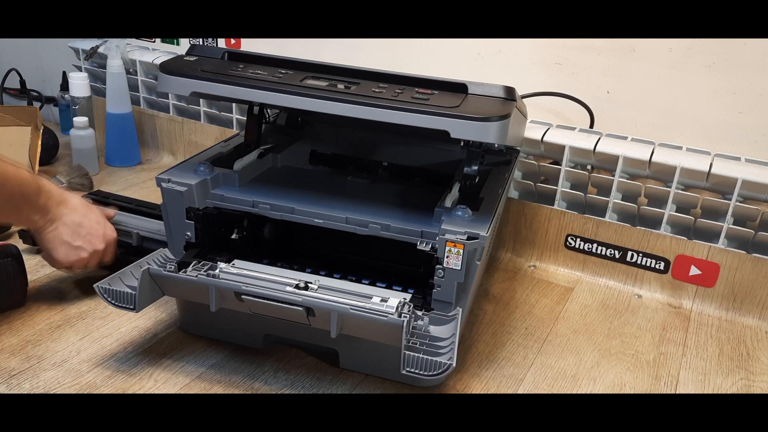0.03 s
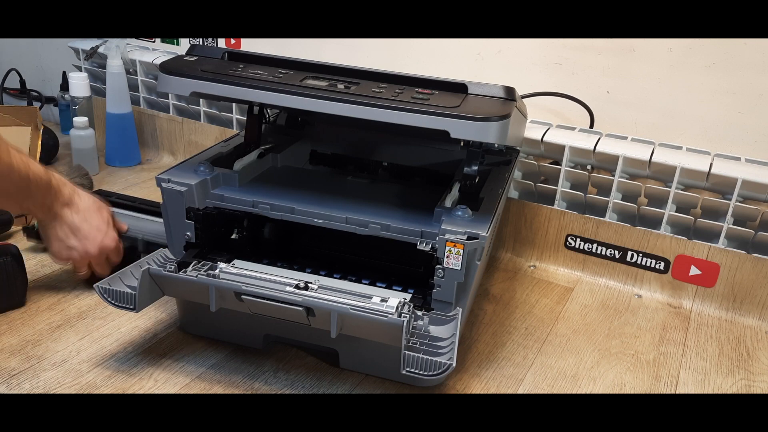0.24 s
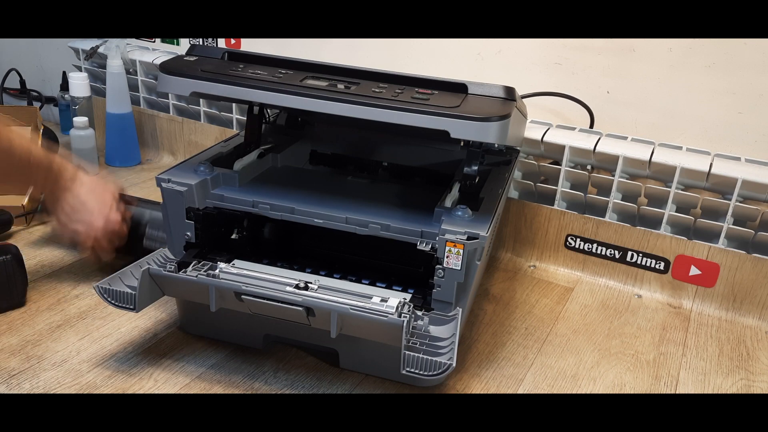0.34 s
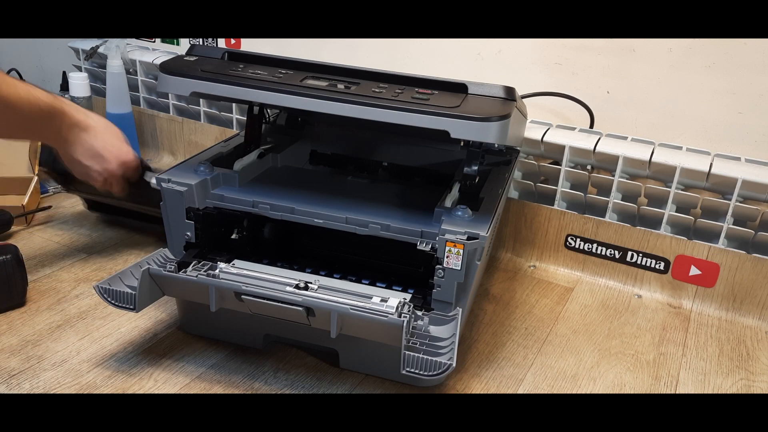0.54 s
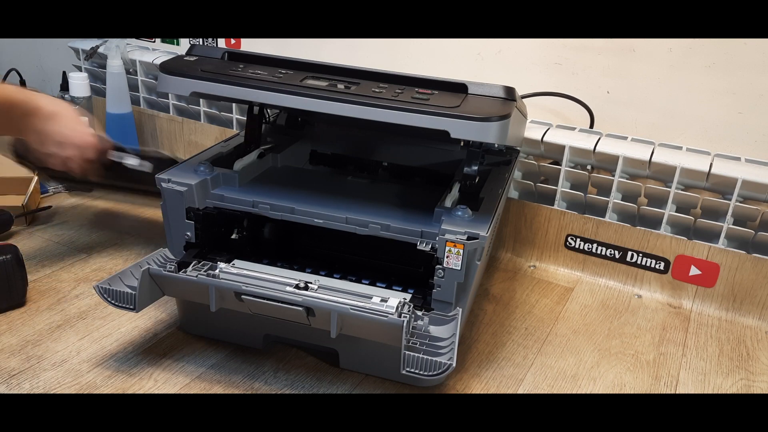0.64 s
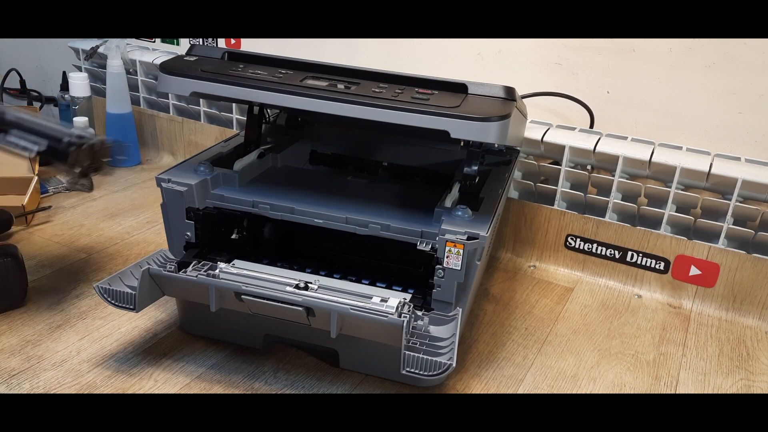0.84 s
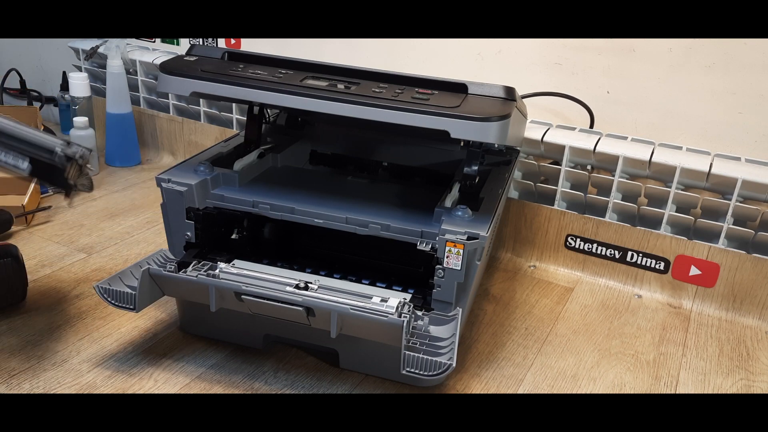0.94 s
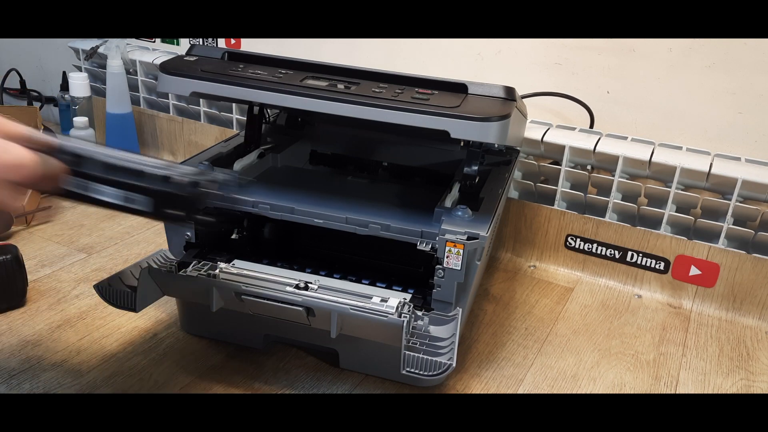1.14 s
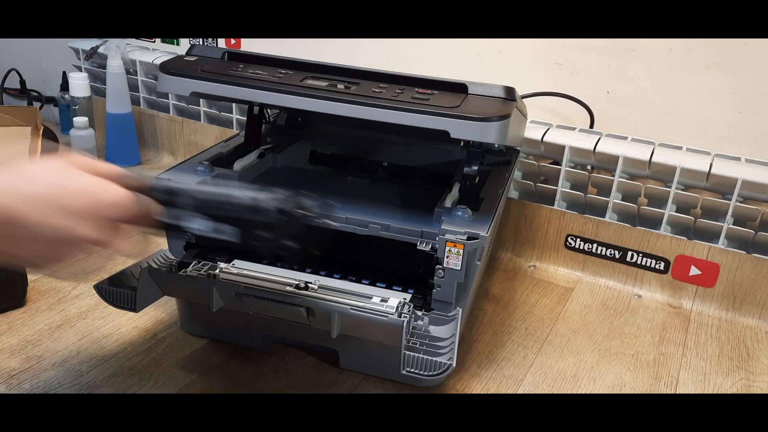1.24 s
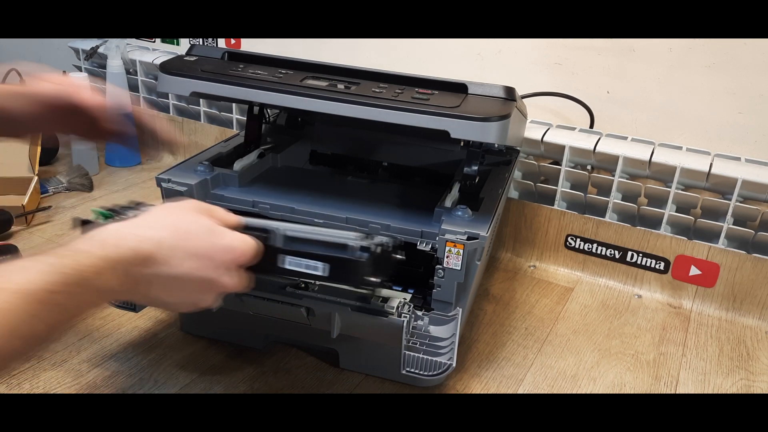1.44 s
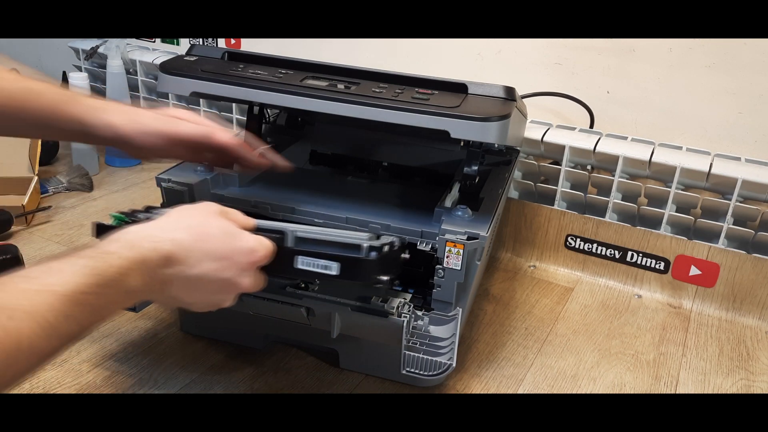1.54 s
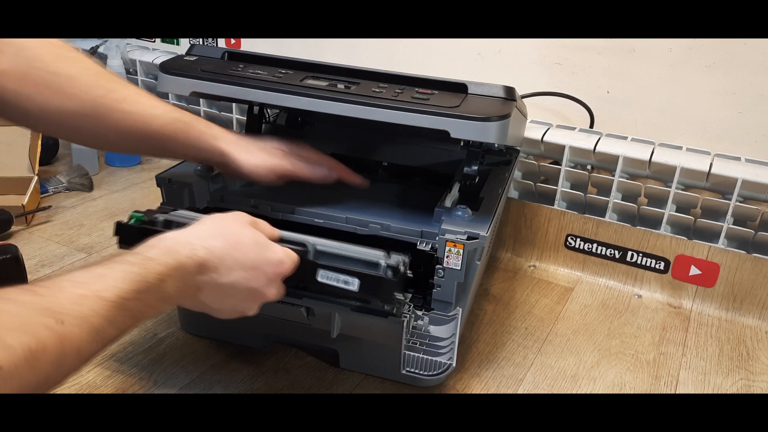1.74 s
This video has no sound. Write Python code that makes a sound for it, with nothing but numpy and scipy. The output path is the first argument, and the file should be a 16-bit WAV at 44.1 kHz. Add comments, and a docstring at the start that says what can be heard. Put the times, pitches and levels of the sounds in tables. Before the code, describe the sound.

Hard plastic cartridge clatter: a short scrape, one loud woody knock with chattering parts, quiet handling, then a softer cluster of hollow bumps against an open printer, heard close in stereo in a small humming workroom.

```python
"""A toner cartridge is dragged off a wooden workbench, tips and knocks on it, then bumps into an open laser printer.
Close stereo microphones in a small workroom hear a low steady drone: coloured noise with narrow resonances.
The drag and the hand's rub are grainy noise; ticks are short noise bursts; small catches ping as decaying sines.
Plastic contacts are noise dying band by band, with a room tail; bench, body and printer add decaying sines."""
import sys
import numpy as np
from scipy import signal
from scipy.io import wavfile

SR = 44100
rng = np.random.default_rng(int(sys.argv[2]) if len(sys.argv) > 2 else 0)


def wav_record(signal):
    """Record a signal, one row per channel, as 16-bit PCM in the file named by sys.argv[1]."""
    frames = np.transpose(np.atleast_2d(signal))
    bounded = np.clip(frames, -1, 1)
    # unit amplitude maps onto the largest positive 16-bit level
    quanta = np.round(bounded * 32767).astype(np.int16)
    wavfile.write(sys.argv[1], SR, quanta)


N = 79380
T = np.arange(N) / SR  # time [s]
RING_T = T[:SR // 2]  # time since a contact [s]

# Room drone: relative density (f/Hz, level/dB per Hz); resonances (f/Hz, width/Hz, rms level/dB)
DRONE_COLOUR = [(25, -16.5), (55, -2), (120, -2), (200, -5), (300, 0.5), (500, 0.5), (650, -11.5),
                (900, -13), (1600, -18.5), (3000, -44), (6000, -38.5), (9500, -29.5), (15500, -45.5)]
DRONE_RESONANCES = [(119.7, 14, -60), (168, 5.3, -67.5), (267.8, 4.8, -70), (440.3, 6, -62),
                    (624.4, 11, -70.5)]
DRONE_DB = -59

# Dragging over the bench: loudness (t/s, level/dB); relative density (f/Hz, level/dB per Hz)
DRAG_LEVEL = [(0, -50), (.05, -57.5), (.11, -47), (.15, -50.5), (.19, -38.5), (.235, -43), (.36, -44.5),
              (.44, -52), (.515, -53), (.55, -56), (.66, -65.5), (.9, -65), (1.19, -89), (1.24, -67),
              (1.3, -63.5), (1.6, -76), (1.8, -55.5)]
DRAG_SPECTRUM = [(60, -9), (130, 14), (400, 7), (900, -2), (1400, 0), (2100, -2.5), (2800, -8.5),
                 (3600, -6.5), (6000, -17.5), (9000, -35.5), (15500, -33.5)]
# Hand and plastic rubbing: loudness (t/s, level/dB); relative density (f/Hz, level/dB per Hz)
RUB_LEVEL = [(0, -68), (.055, -76), (.065, -63.5), (.2, -59.5), (.39, -65), (.45, -60), (.53, -72),
             (.6, -67.5), (.69, -69.5), (.76, -55.5), (.815, -55), (.88, -70.5), (1.11, -95), (1.15, -71),
             (1.32, -71.5), (1.39, -61), (1.5, -73), (1.72, -73.5), (1.79, -57)]
RUB_SPECTRUM = [(100, -5.5), (500, -1), (1500, 3.5), (3500, 0), (6000, -1.5), (9500, -1.5), (13000, -5.5),
                (15500, -6)]
DRAG_RING_DB = -65.5

# Low thumps of the bench top: faint ones during the drag, the strongest as the cartridge knocks
# (t/s, relative level/dB)
BENCH_THUMPS = [(.001, -7), (.178, -5.5), (.1945, 1), (.2555, 9), (.40, -7)]
# Bench top resonances (f/Hz, relative level/dB, t60/s)
BENCH_RESONANCES = [(94.5, -43, 0.34), (121, -30, 0.18), (176, -41.5, 0.11)]
# Small catches spring and ping (t/s, relative level/dB)
PING_HITS = [(.175, -6), (.209, 5.5), (.474, -12.5)]
# Catch resonances (f/Hz, relative level/dB, t60/s)
CATCH_RESONANCES = [(8900, -46.5, .07), (9140, -54, .1), (10860, -55, .07)]
# Dry ticks of loose parts (t/s, relative level/dB)
TICK_HITS = [(.2085, 1), (.2338, 9.5), (.555, 9), (.6225, 6)]
# The cartridge shifts in the hand (t/s, relative level/dB, contact brightness f/Hz)
NUDGE_CONTACTS = [(.463, -12, 1500), (.49, -5.5, 905), (.507, -8, 700), (.727, -17.5, 900),
                  (1.2165, -15, 1310)]
# Relative density of those shifts (f/Hz, level/dB per Hz)
NUDGE_SPECTRUM = [(60, -21), (150, -9), (290, 11), (500, 5.5), (900, -3.5), (1800, -4.5), (3000, -21),
                  (8000, -19), (15500, -25)]
NUDGE_DB, TICK_DB, TICK_BRIGHT_HZ = -35, -54.5, 12000

# The cartridge knocks on the bench and its parts chatter (t/s, relative level/dB, contact brightness f/Hz)
KNOCK_CONTACTS = [(.234, -14.5, 5020), (.2392, -5, 18000), (.2418, 1, 14000), (.2462, 0, 3754),
                  (.2503, -3.5, 6000), (.2585, -6.5, 2195), (.2665, -7.5, 3495), (.2755, -6.5, 5000),
                  (.286, -13, 2000), (.3065, -24, 1800), (.345, -23, 500)]
# Its weight lands on the bench (t/s, relative level/dB)
BENCH_THUDS = [(.2465, 5)]
# Resonances of the cartridge on the bench (f/Hz, relative level/dB, t60/s)
BODY_RESONANCES = [(117.5, -31, 0.19), (161.1, -27, 0.27), (186, -29.5, 0.26), (198.5, -34, 0.16),
                   (314.3, -34, 0.25), (443.6, -17.5, 0.21), (472.7, -26.5, 0.28), (548, -17.5, 0.092),
                   (606, -25.5, .1), (661.6, -30.5, .13), (824, -27.5, 0.14), (990, -33.5, 0.26),
                   (1351, -43, 0.31), (1885, -38, 0.23), (2096, -26, 0.08), (2166, -30.5, 0.3),
                   (2248, -28, 0.21), (2487, -35, .24), (2980, -33, 0.11), (3285, -36, 0.24),
                   (3554, -34, .22), (4355, -39, 0.17)]
# Crowded ringing of the cartridge shell: density (f/Hz, relative level/dB per Hz); decay (f/Hz, t60/s)
CARTRIDGE_SPECTRUM = [(60, -9.5), (120, -2), (170, -1), (230, -6.5), (400, 5), (700, -4.5), (1100, -3.5),
                      (1600, -3.5), (2200, -2.5), (3000, -8), (4500, -9.5), (7000, -16), (9000, -14),
                      (12000, -16), (15500, -23.5)]
CARTRIDGE_DECAY = [(100, 0.067), (500, 0.087), (2200, .14), (6000, 0.23), (14000, 0.15)]

# The cartridge meets the printer (t/s, relative level/dB, contact brightness f/Hz)
BUMP_CONTACTS = [(1.6165, -6, 14000), (1.6205, -6, 2900), (1.6315, -2.5, 8900), (1.6425, -6, 3470),
                 (1.6525, 3.5, 2760), (1.662, -17, 1530), (1.681, 0.5, 1020), (1.697, -6, 900),
                 (1.719, -27, 900), (1.797, -12, 4000)]
# The printer takes the weight (t/s, relative level/dB)
HOUSING_HITS = [(1.6535, 2.5)]
# Printer housing resonances (f/Hz, relative level/dB, t60/s)
HOUSING_RESONANCES = [(240, -41, 0.29), (298, -57, 0.43), (370, -47, 0.16), (409, -41, 0.067),
                      (867, -47, 0.26), (938, -35, 0.11), (1020, -45, 0.14), (1183, -43.5, 0.23),
                      (1385, -55, .2), (1620, -39, 0.1)]
# The printer rocks on its feet (t/s, relative level/dB)
FEET_HITS = [(1.666, -2)]
# Resonances of the printer on its feet (f/Hz, relative level/dB, t60/s)
FEET_RESONANCES = [(58, -43, 1), (78.3, -47, 0.75), (99.7, -37.5, 0.5), (115, -38, 0.2)]
# Crowded ringing of the printer shell: density (f/Hz, relative level/dB per Hz); decay (f/Hz, t60/s)
PRINTER_SPECTRUM = [(60, 1), (110, 12.5), (180, 2), (290, 17), (500, 9), (1000, 4.5), (2000, 1.5),
                    (3000, -7), (6000, -14), (9500, -10.5), (15500, -21)]
PRINTER_DECAY = [(100, 0.18), (500, 0.098), (2200, 0.2), (12000, 0.29)]
CARTRIDGE_DB, PRINTER_DB = -19.5, -35.5

# Room tail after a contact (f/Hz, t60/s)
ROOM_DECAY = [(100, .42), (1000, .38), (2200, .4), (4000, .29), (9000, .24), (14000, .19)]
# Build-up time constant: this many cycles, but never longer than the limit in seconds
BUILD_CYCLES, LONGEST_BUILD_S = 0.84, 0.0052
CHATTER_PER_S, CHATTER_SHARE = 2200, 0.56  # tiny rebounds within contacts; share of noise power

# Microphone pair: left-right likeness (f/Hz, correlation); balance (f/Hz, left minus right level/dB)
MIC_LIKENESS = [(40, 0.1), (130, 0.92), (380, 0.57), (700, 0), (1300, -0.26), (2400, 0.03), (4500, -0.04),
                (15000, 0)]
MIC_BALANCE = [(100, -.5), (600, 1.2), (2000, .5), (5500, -.5), (8000, 4), (10500, 8.5), (15000, 9)]
PORT_DELAY_S = 0.00019  # a mode reaches the two microphones this far apart, up to a quarter cycle
CUTOFF_HZ = 15850
LEFT_RIGHT = np.array([[1], [-1]])


def from_db(db):
    """Decibels to amplitude gain."""
    return 10 ** (np.asarray(db) / 20)


def rms_one(x):
    """Scale to unit rms."""
    return x / np.sqrt(np.mean(x ** 2) + 1e-20)


def at_hz(points, hz):
    """Read a table on a log-frequency axis."""
    f, values = np.transpose(points)
    return np.interp(np.log(hz), np.log(f), values)


def level(curve):
    """Gain over time from (t/s, level/dB) points."""
    return from_db(np.interp(T, *np.transpose(curve)))


def sample_at(seconds):
    """Nearest earlier sample, kept inside the scene."""
    return int(np.clip(seconds * SR, 0, N - 1))


def clicks(rows):
    """One impulse of force for each (t/s, level/dB) row."""
    force = np.zeros(N)
    for seconds, db in rows:
        force[sample_at(seconds)] += from_db(db)
    return force


def play(force, response):
    """Drive a stereo response with a force by convolution."""
    return signal.fftconvolve(force[None], response, axes=1)[:, :N]


def sides(hz):
    """Left and right microphone gain at a frequency."""
    return from_db(at_hz(MIC_BALANCE, hz) * LEFT_RIGHT / 2)


def grainy(per_s, share):
    """Gain that gathers a share of a noise's power into random tiny clicks."""
    chance = per_s / SR
    share = np.clip(share, 0, 1)
    hits = rng.random(N) < chance
    return np.sqrt(1 - share + share * hits / chance)


def coloured(spectrum, shape=lambda hz: 1, texture=1):
    """Stereo noise in third-octave bands, scaled for rms 1 before balance, texture and band envelopes."""
    out, power = 0, 0
    edges = 22 * 2 ** (np.arange(30) / 3)
    white = rng.standard_normal((2, 2, N)) * texture
    for k, (low, high) in enumerate(zip(edges, edges[1:])):
        if high < spectrum[0][0]:
            continue
        band = signal.butter(2, [low, high], "band", fs=SR, output="sos")
        mid, side = signal.sosfilt(band, white[k % 2])  # neighbouring bands use separate noise
        hz = np.sqrt(low * high)
        gain = from_db(at_hz(spectrum, hz))
        alike = np.clip(at_hz(MIC_LIKENESS, hz), -1, 1)
        pair = np.sqrt(1 + alike) * mid + np.sqrt(1 - alike) * side * LEFT_RIGHT
        out = out + gain * sides(hz) * pair * shape(hz)
        power += 2 * gain ** 2 * (high - low) / (SR / 2)
    return out / np.sqrt(power)


def dying(t60):
    """Exponential decay that falls 60 dB in t60 seconds."""
    return np.exp(-np.log(1000) * RING_T / t60)


def building(hz):
    """A struck body takes a moment to start ringing, longest in the bass."""
    rate = max(hz / BUILD_CYCLES, 1 / LONGEST_BUILD_S)
    return 1 - np.exp(-RING_T * rate)


def ringing(modes):
    """Decaying sines of separate modes, each out of step between the two microphones."""
    out = 0
    for hz, db, t60 in modes:
        apart = min(2 * np.pi * hz * PORT_DELAY_S, np.pi / 2) * LEFT_RIGHT / 2
        wave = np.sin(2 * np.pi * hz * RING_T + apart)
        out = out + from_db(db) * sides(hz) * dying(t60) * building(hz) * wave
    return out


def shell(contacts, spectrum, t60s, crack_db, crack_s, room_db):
    """Plastic contacts: a crack (t60 crack_s), crowded modes dying by band, and a room tail."""
    def shape(hz):
        """Envelope of one band, adding the energy of all contacts."""
        crack = from_db(crack_db) * dying(crack_s)
        modes = dying(at_hz(t60s, hz))
        room = from_db(room_db) * dying(at_hz(ROOM_DECAY, hz))
        energy = ((crack + modes + room) * building(hz)) ** 2
        total = np.zeros(N + SR)
        for seconds, db, bright_hz in contacts:
            start = sample_at(seconds)
            dulling = 1 + (hz / bright_hz) ** 2  # less treble above the contact brightness
            total[start:start + len(energy)] += from_db(db) ** 2 / dulling * energy
        return np.sqrt(total[:N])
    return coloured(spectrum, shape, grainy(CHATTER_PER_S, CHATTER_SHARE))


def friction(colour, grains_per_s, grain_share):
    """Smooth sliding noise with tiny slips in it."""
    return coloured(colour, texture=grainy(grains_per_s, grain_share))


def drone():
    """Low room noise with a few narrow resonances; only the resonances are the same in both microphones."""
    out = from_db(DRONE_DB) * coloured(DRONE_COLOUR)
    for hz, width_hz, db in DRONE_RESONANCES:
        b, a = signal.iirpeak(hz, hz / width_hz, fs=SR)
        hum = signal.lfilter(b, a, rng.standard_normal(N + SR))[SR:]  # drop the first second of build-up
        out = out + from_db(db) * rms_one(hum)
    return out


def sliding():
    """Friction of the drag, which makes the cartridge ring faintly, and the rub of the hand."""
    drag = level(DRAG_LEVEL) * friction(DRAG_SPECTRUM, grains_per_s=250, grain_share=0.24)
    highpass = signal.butter(2, 1500, "high", fs=SR, output="sos")
    force = signal.sosfilt(highpass, drag[0])
    ring = from_db(DRAG_RING_DB) * rms_one(play(force, ringing(BODY_RESONANCES)))
    rub = level(RUB_LEVEL) * friction(RUB_SPECTRUM, grains_per_s=4500, grain_share=0.15)
    return drag + ring + rub


def bench_thumps():
    """The bench top's low modes thump faintly during the drag and most strongly in the knock."""
    return play(clicks(BENCH_THUMPS), ringing(BENCH_RESONANCES))


def loose_ticks():
    """Loose parts tick as very short noise bursts with softened treble."""
    burst = coloured(RUB_SPECTRUM)[:, :len(RING_T)] * dying(t60=0.01)
    lowpass = signal.butter(1, TICK_BRIGHT_HZ, fs=SR, output="sos")
    return from_db(TICK_DB) * signal.sosfilt(lowpass, play(clicks(TICK_HITS), burst))


def handling():
    """Small catches ping at their modes, loose parts tick, and nudges excite dull plastic noise."""
    pings = play(clicks(PING_HITS), ringing(CATCH_RESONANCES))
    nudges = shell(NUDGE_CONTACTS, NUDGE_SPECTRUM, PRINTER_DECAY, crack_db=-18, crack_s=0.0075, room_db=-12.5)
    return pings + loose_ticks() + from_db(NUDGE_DB) * nudges


def bench_knock():
    """The cartridge's parts chatter while its body on the bench booms in separate modes."""
    clatter = shell(KNOCK_CONTACTS, CARTRIDGE_SPECTRUM, CARTRIDGE_DECAY,
                    crack_db=3.5, crack_s=0.015, room_db=-12.5)
    boom = play(clicks(BENCH_THUDS), ringing(BODY_RESONANCES))
    return from_db(CARTRIDGE_DB) * clatter + boom


def printer_bump():
    """The cartridge stutters against the hollow housing, whose modes and feet answer the weight."""
    clatter = shell(BUMP_CONTACTS, PRINTER_SPECTRUM, PRINTER_DECAY,
                    crack_db=-11, crack_s=0.0048, room_db=-7.5)
    housing = play(clicks(HOUSING_HITS), ringing(HOUSING_RESONANCES))
    feet = play(clicks(FEET_HITS), ringing(FEET_RESONANCES))
    return from_db(PRINTER_DB) * clatter + housing + feet


def scene():
    """Everything at the two close microphones."""
    return drone() + sliding() + bench_thumps() + handling() + bench_knock() + printer_bump()


def record(dry):
    """A steep elliptic low-pass removes the top treble."""
    lowpass = signal.ellip(12, 0.1, 80, CUTOFF_HZ, fs=SR, output="sos")
    return signal.sosfilt(lowpass, dry)


dry = scene()
out = record(dry)
wav_record(out)
```